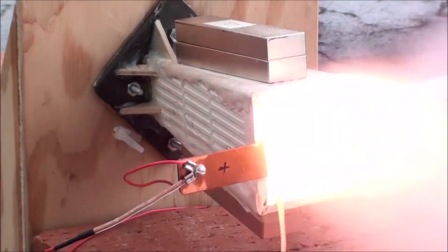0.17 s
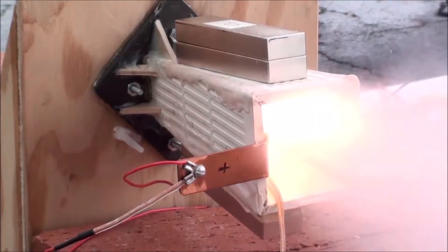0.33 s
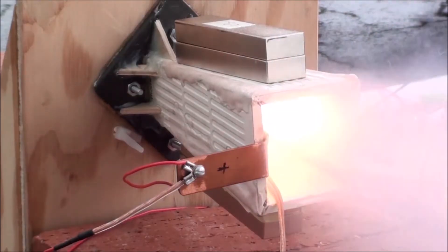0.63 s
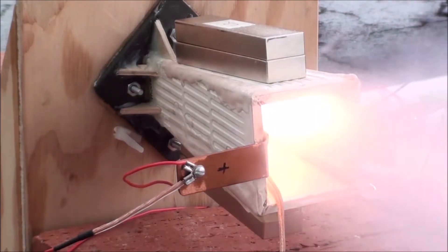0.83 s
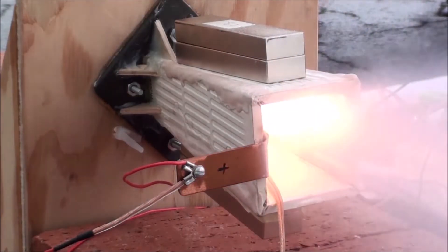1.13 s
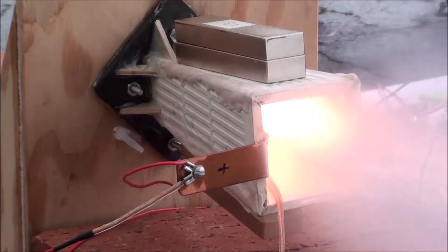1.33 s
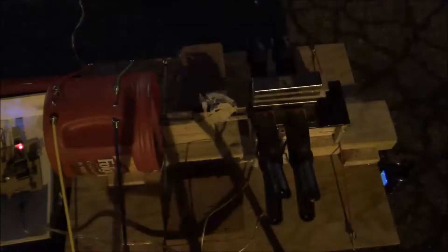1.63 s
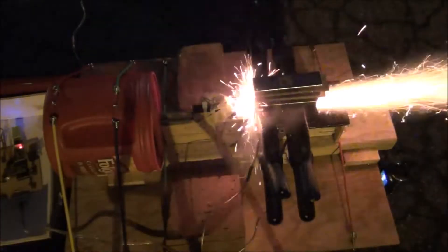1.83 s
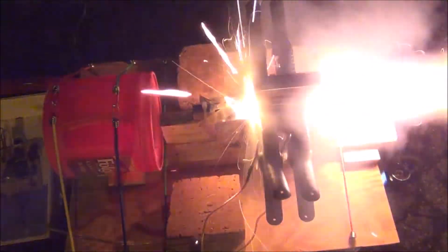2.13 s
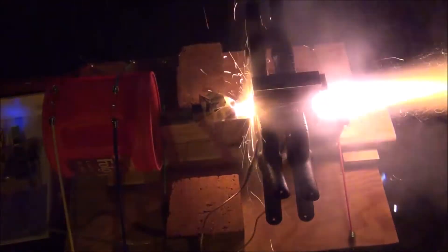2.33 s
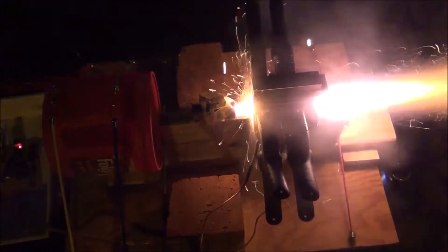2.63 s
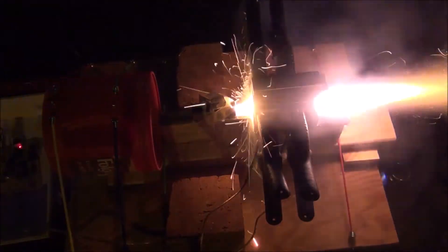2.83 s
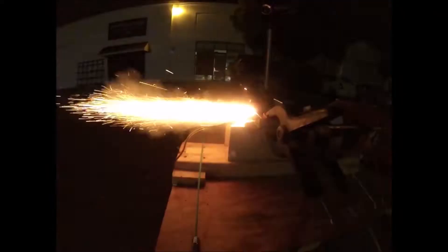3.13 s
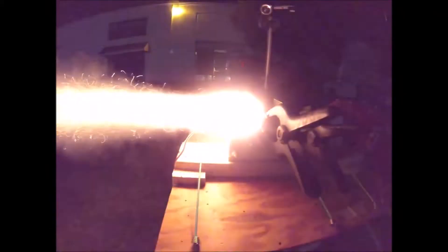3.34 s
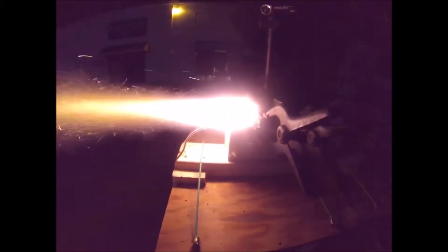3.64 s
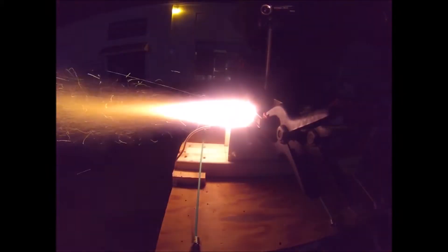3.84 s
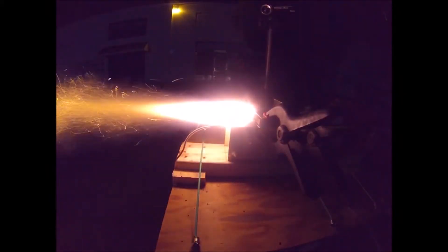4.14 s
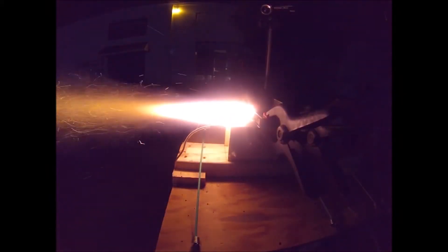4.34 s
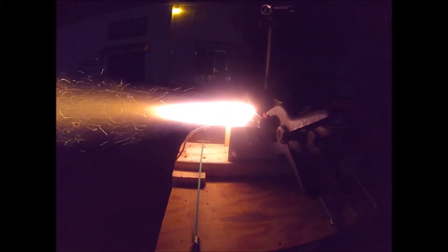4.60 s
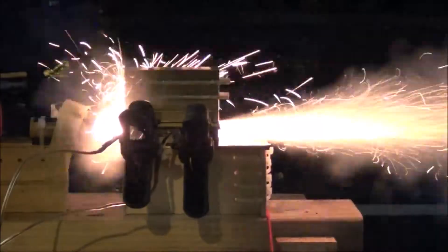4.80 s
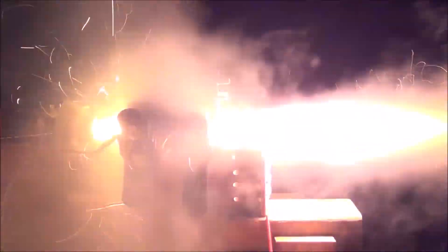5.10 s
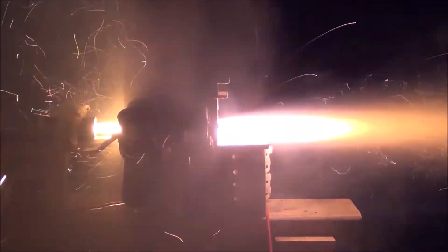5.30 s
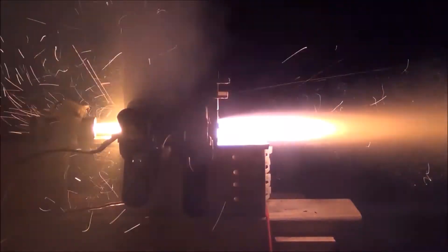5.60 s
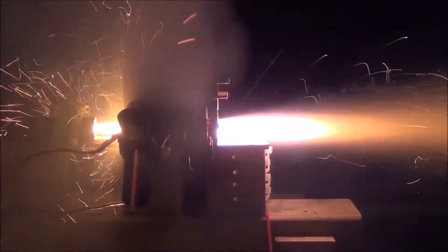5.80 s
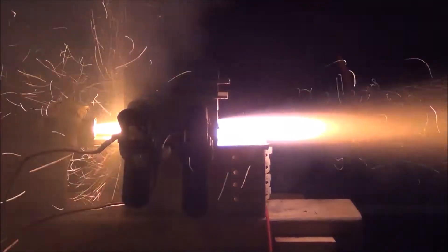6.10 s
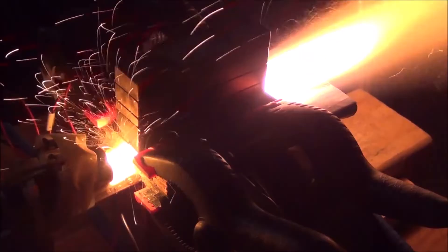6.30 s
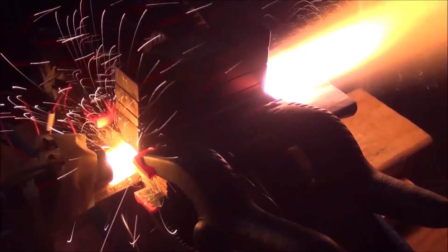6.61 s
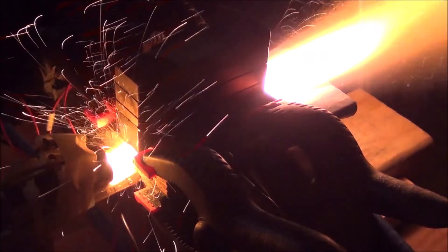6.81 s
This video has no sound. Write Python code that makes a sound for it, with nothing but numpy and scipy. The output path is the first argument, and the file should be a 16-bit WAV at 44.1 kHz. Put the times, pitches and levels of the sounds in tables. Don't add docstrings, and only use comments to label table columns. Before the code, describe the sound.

Continuous turbulent exhaust, close and distorted, with a strident ring near 8 kHz. One motor roars steadily; after a soft low-level lull another spits, catches in fits and blasts. The third is much quieter, farther away and centred, with crackle and low thumps and a momentary dropout. The fourth returns loud, piercing and close. Abruptly the treble vanishes, leaving a hollow, slowed low-mid rush. Outdoors, with hardly any reverberation.

```python
import sys
import numpy as np
from scipy import signal
from scipy.io import wavfile
from scipy.ndimage import uniform_filter1d

SR = 44100
rng = np.random.default_rng(int(sys.argv[2]) if len(sys.argv) > 2 else 0)


def nominal_scale(level):
    x = np.asarray(level, float) / 20
    return 10 ** x


def wrap_up_sound(samples):
    columns = np.atleast_2d(samples).T
    tamed = np.clip(columns, -1, 1)
    steps = np.round(tamed * 32767).astype(np.int16)
    wavfile.write(sys.argv[1], SR, steps)


N = 306582
LEAD = 1024


def jet(cut, burn, colour, side, mic, overload):
    t0, t1, top_hz = cut
    tied, phase, patchy_db, flicker_db, crackle_db = mic
    n = min(round(t1 * SR), N) - round(t0 * SR) + 2 * LEAD
    hz, t, z = frames(exhaust(n, flicker_db, crackle_db))
    t = t + t0 - LEAD / SR
    heard = (hz < top_hz)[:, None]

    patches = uniform_filter1d(rng.standard_normal(z[0].shape), size=12, axis=0)
    patches = evened(uniform_filter1d(patches, size=24, axis=1))
    smooth = nominal_scale(field_db(t, hz, burn, colour)) * heard * np.sqrt(len(hz))
    gain = smooth * nominal_scale(patchy_db * patches)
    gain *= ((smooth ** 2).sum(0) / (gain ** 2).sum(0)) ** 0.39

    tied = np.clip(tied, 0, 1)
    across = tied * np.exp(1j * phase) * z[0] + np.sqrt(1 - tied ** 2) * z[1]
    clean = gain * np.array([z[0], nominal_scale(read(side, hz))[:, None] * across])
    ports = samples(sum_difference(clean))[:, :n]
    pressed = sum_difference(frames(overloaded(ports, *overload))[2])
    restore = made_up(clean, pressed)
    pressed *= nominal_scale(swings_db(t, hz)) * (hz > 0)[:, None]
    return samples(sum_difference(pressed * restore * heard))[:, LEAD:n - LEAD]


def exhaust(n, flicker_db, crackle_db):
    air = rng.standard_normal((2, n))
    air *= nominal_scale(flicker_db * evened(uniform_filter1d(rng.standard_normal(n), size=260)))
    air[0] = evened(air[0] + nominal_scale(crackle_db) * crackle(n))
    return air


def crackle(n):
    size = nominal_scale(3 * np.minimum(rng.exponential(1, n), 2.5))
    shocks = size * (rng.random(n) < 140 / SR)
    return -evened(signal.lfilter([1], [1, -.85], shocks)) * 1.53


BAND_EDGES_HZ = [300, 1400, 5150]


def field_db(t, hz, burn, colour):
    shape = colour_db(t, hz, colour)
    band = np.digitize(hz, BAND_EDGES_HZ)
    lift = []
    for k, level in enumerate(layer_levels_db(t, *burn)):
        power = (nominal_scale(shape[band == k]) ** 2).sum(0)
        lift.append(level - 10 * np.log10(power))
    return shape + uniform_filter1d(np.array(lift)[band], size=5, axis=0)


# (start [s], end [s], edge [s], level [dB])
CHUFFS = [
    (.02, .245, .015, 6.5),
    (.527, .557, .007, 6.5),
    (.49, .515, .006, -4),
    (4.885, 4.97, .01, 5.5),
    (1.74, 1.764, .003, -4),
    (1.765, 1.775, .003, 6),
    (1.78, 1.96, .02, 3),
    (4.73, 4.76, .008, 3),
    (4.79, 4.88, .01, -2),
]
CHUFF_SHARE = (0.28, 0.96, 0.44, -0.26)
# (start [s], end [s], edge [s], level [dB])
DIMMING = [
    (3.862, 3.905, .004, -7),
    (3.915, 3.99, .01, 3),
    (4.1, 4.27, .05, 4),
    (4.33, 4.8, .05, -4),
    (1.71, 1.752, .006, 6),
]


def layer_levels_db(t, steady, follow, thrust):
    levels = np.array(steady)[:, None] + np.outer(follow, np.interp(t, *np.transpose(thrust)))
    levels += np.outer(CHUFF_SHARE, sum(plateau(t, *row) for row in CHUFFS))
    levels[-1] += sum(plateau(t, *row) for row in DIMMING)
    return levels


# (centre [s], length [s], frequency
# [Hz], width [Hz], level [dB])
COLOUR_SWELLS = [(.1, .13, 1170, 170, 9), (.543, .016, 1100, 140, 9), (1.87, .1, 2300, 250, 4.5),
                 (1.935, .025, 2200, 280, 4), (1.8, .04, 1550, 220, 6), (4.92, .035, 2250, 220, 9),
                 (1.85, .1, 14000, 2600, -5), (4.8, .08, 7400, 450, 3), (5.1, .08, 7700, 650, 4),
                 (4.96, .03, 2750, 250, 5), (1.82, .05, 1900, 400, 5), (5.05, .11, 13500, 2500, 5),
                 (4.78, .06, 15600, 500, -9), (.07, .05, 1750, 220, -5), (4.05, .05, 2000, 400, 4),
                 (2.13, .08, 12000, 2500, 3), (6.05, .3, 2750, 150, 2), (4.78, .06, 13000, 1800, -3),
                 (4.95, .06, 5500, 900, 2.5), (1.9, .05, 5000, 300, 3), (4.755, .03, 4600, 500, -5),
                 (4.82, .04, 3400, 400, -4), (4.86, .04, 5700, 500, -3), (4.74, .012, 2300, 600, 4),
                 (1.742, .012, 7000, 1800, 8), (3.96, .04, 13500, 1500, 5), (1.68, .08, 15600, 150, 6),
                 (1.86, .08, 4200, 300, 3)]
# (start [s], end [s], frequency [Hz], width [Hz], level [dB])
RIPPLES = [(1.7, 3.2, 6850, 200, -2.5), (1.4, 4.1, 8550, 250, 3.5), (1.7, 3.9, 8400, 200, -3.5),
           (3.199, 4.73, 4600, 79, -13.5), (3, 7.2, 3900, 77, -11), (4.728, 6.335, 8760, 121, 0),
           (5.3, 7.3, 8840, 150, 4), (4.725, 6.33, 9740, 180, 5), (4.731, 6.33, 5060, 102.5, -1)]


def colour_db(t, hz, colour):
    where = np.array([db * bump(hz, f, width) for *_, f, width, db in COLOUR_SWELLS + RIPPLES])
    when = [bump(t, *row[:2]) for row in COLOUR_SWELLS]
    when += [(t > row[0]) & (t < row[1]) for row in RIPPLES]
    return read(colour, hz)[:, None] + where.T @ np.array(when)


def overloaded(ports, ceiling_db, lopsided):
    bent = np.tanh(ports / nominal_scale(ceiling_db) + lopsided)
    return bent - uniform_filter1d(bent, size=3000)


def made_up(clean, pressed):
    before, after = [abs(v) ** 2 + 1e-24 for v in (clean, pressed)]
    level_before, level_after = [uniform_filter1d(p[0].sum(0), size=16) for p in (before, after)]
    makeup = level_before / level_after
    wanted, present = [abs(uniform_filter1d(uniform_filter1d(p, size=28, axis=2), size=3, axis=1)) + 1e-20
                       for p in (before, after * makeup)]
    return np.sqrt(np.clip(abs(makeup * wanted / present), 0, 100))


# (start [s], end [s], edge [s], level [dB], below [Hz])
BASS_SWINGS = [(1.781, 1.939, 0.013, -13, 1220), (1.8, 1.935, .015, -5, 200),
               (2.15, 2.252, 0.036, -12.5, 90), (2.772, 2.944, 0.041, -4, 1195),
               (2.78, 3.05, 0.028, 3.5, 120.5), (4.79, 4.95, 0.046, -12, 423), (4.82, 4.9, .015, -9, 130),
               (5.038, 5.18, 0.039, 5, 401), (5.22, 5.41, 0.028, -6, 447), (5.25, 5.36, .015, -12, 130),
               (5.52, 5.6, .015, -14, 90), (5.74, 5.95, .02, -13, 90), (5.98, 6.3, .02, -7, 70),
               (5.753, 5.92, 0.035, -1, 900), (3.845, 3.904, 0.0091, 10, 300), (4.17, 4.3, .03, -1, 900),
               (4.45, 4.72, 0.0285, 4.5, 300)]
# (centre [s], length [s], above [Hz], level [dB])
DROPS = [
    (3.862, 0.0038, 5300, 0),
    (4.403, 0.005, 5200, -13),
    (4.793, .028, 15290, -34.5),
]


def swings_db(t, hz):
    below = np.array([1 / (1 + (hz / row[-1]) ** 8) for row in BASS_SWINGS])
    out = below.T @ np.array([plateau(t, *row[:-1]) for row in BASS_SWINGS])
    return out + sum(db * np.outer(hz > f, bump(t, centre, length)) for centre, length, f, db in DROPS)


# (start [s], end [s], edge [s], level [dB])
STUTTERS = [
    (1.7625, 1.7665, .0006, -9),
    (1.769, 1.7715, .0005, -7),
    (1.774, 1.7763, .0005, -5),
]


def stutter(t):
    return nominal_scale(sum(plateau(t, *row) for row in STUTTERS))


# (time [s], peak [dB], length [ms], frequency [Hz])
SPITS = [
    (1.716, -29, 2, 6500),
    (1.7245, -15.5, 2.5, 5500),
    (1.7545, -14, 3, 7500),
    (1.7602, -4.5, .7, 7500),
    (1.7673, -1, 1, 6000),
    (1.7718, -4, 1.2, 7500),
    (1.7766, 2, .5, 7000),
    (1.7862, -0.5, .5, 7000),
    (1.816, -4, .6, 6500),
    (1.862, -4, .6, 6500),
]


def spits():
    out = np.zeros(N)
    t = np.arange(600) / SR
    for s, db, ms, hz in SPITS:
        throat = signal.iirpeak(hz, 1.2, SR)
        burst = rng.standard_normal(600) * np.exp(-t * 1000 / ms)
        ring = signal.lfilter(*throat, signal.lfilter(*throat, burst))
        ring += 0.2 * burst * nominal_scale(db)
        out[round(s * SR):][:600] += nominal_scale(db) * ring / abs(ring).max()
    return signal.oaconvolve(out, signal.firwin(201, 15700, fs=SR), "same")


# (time [s], peak [dB], frequency [Hz])
THUMPS = [
    (3.404, -15.5, 500),
    (3.471, -20, 600),
    (3.551, -24, 550),
    (3.63, -16, 500),
    (3.779, -18, 400),
    (4.532, -15, 606),
    (4.144, -18.5, 700),
    (4.619, -15.5, 600),
]


def thumps():
    out = np.zeros(N)
    for s, db, hz in THUMPS:
        cycles = np.arange(400) / SR * hz
        fade = np.exp(-1.2 * cycles) * np.clip(2 - cycles, 0, 1)
        out[round(s * SR):][:400] -= nominal_scale(db) * np.sin(2 * np.pi * cycles) * fade
    return out


def add_smear(out, sound, end):
    smear = out[:, end:][:, :1500]
    length = smear.shape[1]
    tail = sound[:, :-1501:-1][:, :length]
    smear += tail * nominal_scale(-76.5 - 1600 * np.arange(length) / SR)


def evened(x):
    return x / np.sqrt(np.mean(x ** 2) + 1e-20)


def read(points, hz):
    f, value = np.transpose(points)
    return np.interp(np.log(hz + 1), np.log(f + 1), value)


def bump(x, centre, width):
    return np.exp(-.5 * ((x - centre) / width) ** 2)


def plateau(t, t0, t1, edge, db):
    return db * (np.tanh((t - t0) / edge) - np.tanh((t - t1) / edge)) / 2


def frames(x):
    return signal.stft(x, SR, nperseg=1024, noverlap=896)


def samples(z):
    return signal.istft(z, SR, nperseg=1024, noverlap=896)[1]


def sum_difference(pair):
    return np.array([pair[0] + pair[1], pair[0] - pair[1]])


# (start [s], end [s], upper limit [Hz])
CUTS = [
    (.026, 1.6157, 15800),
    (1.630, 1.756, 15800),
    (1.7525, 3.184, 15800),
    (3.229, 3.93, 15100),
    (3.93, 4.7187, 14900),
    (4.7304, 6.321, 15800),
    (6.332, 7, 3120),
]
# (frequency [Hz], level [dB per Hz])
FIRST = [(30, -27), (47, -26), (49, -24.1), (69, -22.5), (82, -21), (175, -12), (730, -10.5), (1066, -9.5),
         (1766, -12.5), (2179, -8.5), (4841, -8), (7066, 2.5), (12201, -15), (15700, -19)]
LULL = [(30, -26.5), (89, -0.5), (161, -6), (235, -7), (460, -3.5), (829, -2), (2578, -22), (4000, -33),
        (5200, -32), (8000, -30.5), (15700, -32.5)]
SECOND = [(30, -30), (47, -30.5), (49, -26.2), (58, -21.5), (154, -10.5), (373, -9), (1160, -13),
          (1766, -16.5), (2924, -16), (4092, -11), (5266, -17.5), (7686, 1.5), (12201, -22.5),
          (15700, -24.5)]
FAR_EARLY = [(30, -13), (171, -6), (541, 2.5), (644, -0.5), (1000, 1.5), (1387, -2.5), (1709, -19),
             (2182, -7), (2689, -22), (3554, -1.5), (3990, -11.5), (4381, -6.5), (4800, -8), (5149, -20)]
FAR_LATE = [(30, -6), (171, -9), (487, -2), (1049, -3), (1339, -7), (1436, -18), (2100, -7.5), (2597, -26),
            (2784, -24), (3554, -8), (3990, -20), (4381, -10.5), (4800, -17), (5149, -33)]
FOURTH = [(30, -45.5), (49, -42), (70, -28), (125, -24.5), (290, -20), (730, -12), (1022, -16.5),
          (1316, -10.5), (2370, -8), (2688, -6.5), (5049, -5), (8015, 7), (13840, -18.5), (15700, -19.5)]
SLOWED = [(30, -15), (129, -27), (264, -6.5), (360, -12.5), (477, -4), (611, -13), (737, -4), (888, -15.5),
          (1037, 0), (1104, 5), (1415, -4), (1760, -23), (2328, -24.5), (3080, -34.5)]
# (frequency [Hz], level [dB per Hz])
FAR_TREBLE = [
    [(5151, -7), (5600, 1), (6236, 1), (7301, -4.5), (10867, -5), (13627, -15.5), (15000, -23)],
    [(5151, -4), (5500, 5), (6224, 3), (10551, -6.5), (13553, -19.5), (14500, -24), (14900, -48)],
]
# (frequency [Hz], side minus mid [dB])
SIDES = [
    [(40, -29.5), (133, -10), (746, -2), (6500, -20.5), (8957, -22.5), (10515, -35), (11858, -28),
     (13374, -23), (15700, -23)],
    [(60, -9.5), (240, -7), (950, -10), (3770, -11), (15000, -12)],
    [(40, -1), (100, -12.5), (400, -16), (1207, -29.5), (2483, -29.5), (4200, -25), (6500, -17.5),
     (8300, -22), (10000, -38), (15700, -21)],
    [(40, 9), (120, -6), (400, -18), (1100, -28.5), (2585, -32.5), (3288, -40.5), (4716, -40),
     (5999, -11.5), (10000, -23.5), (15700, -23.5)],
    [(40, -18), (144, -27.5), (326, -71), (424, -85), (535, -77), (638, -31), (879, -7.5), (3080, -23)],
]
# (side that follows mid [share], its phase [rad], patches [dB], flicker [dB], crackle [dB])
MICS = [(.2, 4.5, 1.13, 1.9, -24.5), (.9, 3.5, 0.5, 1.8, -26.5), (.7, 3.3, 1.37, 0.94, -27.5),
        (.01, .01, 1.4, 1.1, -20), (.01, .01, 0.6, 0.3, -23), (.5, -.5, 1.36, 0.78, -23),
        (1, -1.57, 1.2, 0.9, -34.5)]
# (overload ceiling [dB], lopsidedness [share of ceiling])
OVERLOADS = [(-8.5, 0), (0, 0), (-5.5, .2), (0, 0), (0, 0), (-3, .16), (-13, .35)]
# (rumble [dB], roar [dB], rush [dB], hiss [dB])
STEADY = [(-33.5, -23, -17, -8.5), (-25.5, -26.5, -36, -47.5), (-34, -28, -20.5, -8.5),
          (-47, -32.5, -32.5, -35.5), (-43, -28, -35, -48), (-45.5, -32.5, -20.5, -12.5),
          (-32, -19, -28.5, -90)]
FOLLOW = [(1.4, .3, 0.76, 0.64), (2, 1.6, .2, .1), (.1, .3, 0.38, 0.75), (.5, 0.63, 0.87, 1.1),
          (.6, 1, .7, .4), (1.5, .8, 0.43, 0.55), (3, .1, 0.32, 1.1)]
# (time [s], level [dB])
THRUST = [
    [(.03, -7), (.11, -1.5), (.22, 0.5), (.28, .3), (1.61, 0.5)],
    [(1.634, 1), (1.705, -1.5), (1.745, -1.5), (1.76, -0.5)],
    [(1.746, -45), (1.756, -20), (1.775, -1), (1.823, -3), (1.953, -3), (2.013, 0), (2.19, 1.5), (2.3, -.5),
     (3.18, -1)],
    [(3.232, 0), (3.4, -0.5), (3.6, -0.5), (3.85, -2), (3.903, -7.5), (3.926, -22)],
    [(3.942, -20), (4.127, -3), (4.2, 2.5), (4.4, -2), (4.52, 0.5), (4.71, 0.5)],
    [(4.732, -3), (4.742, 2), (4.86, -1.8), (5.01, -0.5), (5.094, 4.5), (5.25, 0.5), (5.53, 1), (5.83, -1),
     (6.314, 0)],
    [(6.336, 0.5), (6.45, 0.7), (6.94, 0.5)],
]


def scene():
    out = np.zeros((2, N)) + spits() + thumps()
    mono = [(30, -200)]
    colours = [FIRST, LULL, SECOND, FAR_EARLY + FAR_TREBLE[0], FAR_LATE + FAR_TREBLE[1], FOURTH, SLOWED]
    sides = SIDES[:3] + [mono, mono] + SIDES[3:]
    burns = zip(STEADY, FOLLOW, THRUST)
    for cut, *shot in zip(CUTS, burns, colours, sides, MICS, OVERLOADS):
        sound = jet(cut, *shot)
        start = round(cut[0] * SR)
        end = start + sound.shape[1]
        t = cut[0] + np.arange(sound.shape[1]) / SR
        splice = np.clip(np.minimum(t - cut[0], cut[1] - t) / .0006, 0, 1)
        out[:, start:end] += sound * splice * stutter(t)
        add_smear(out, sound, end)
    return out


def low_pass(x):
    return signal.sosfilt(signal.butter(12, 15800, fs=SR, output="sos"), x)


def record(dry):
    bass_cut = signal.butter(2, 32, "high", fs=SR, output="sos")
    mix = np.clip(signal.sosfilt(bass_cut, dry), -1, 1)
    return low_pass(mix)


dry = scene()
out = record(dry)
wrap_up_sound(out)
```